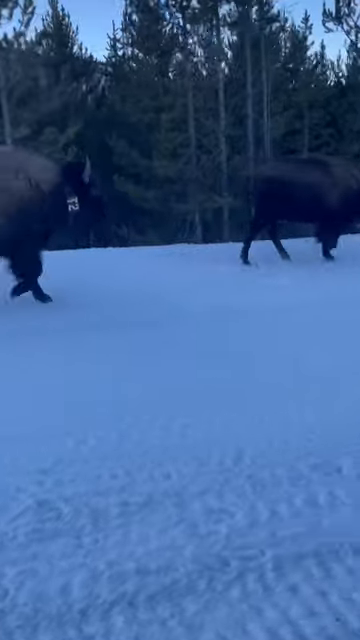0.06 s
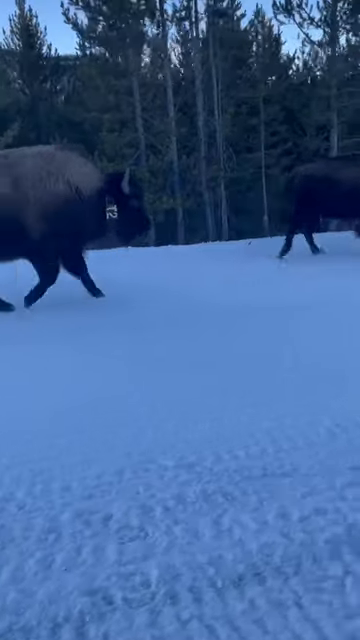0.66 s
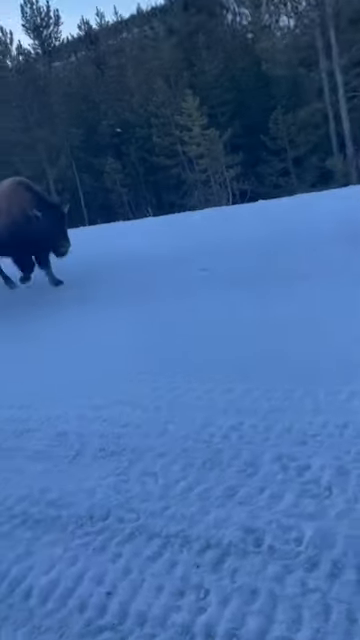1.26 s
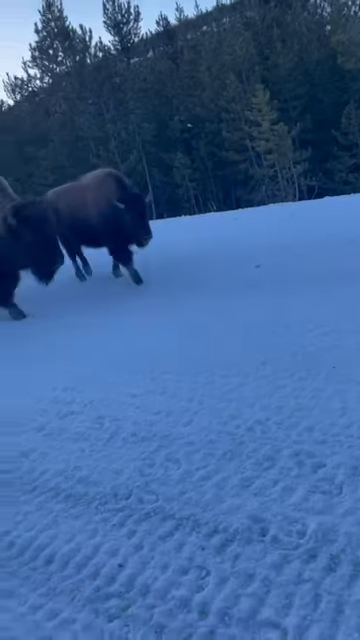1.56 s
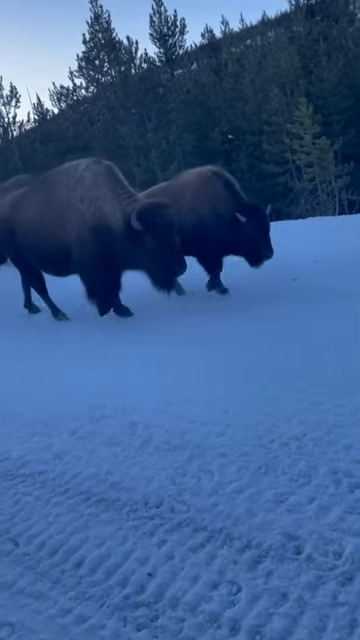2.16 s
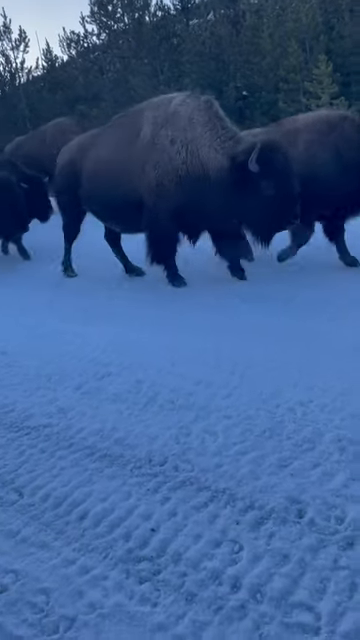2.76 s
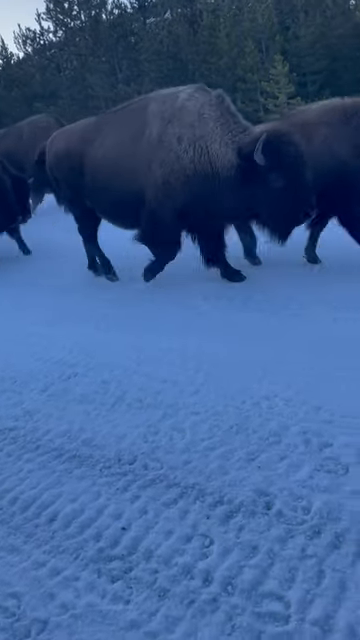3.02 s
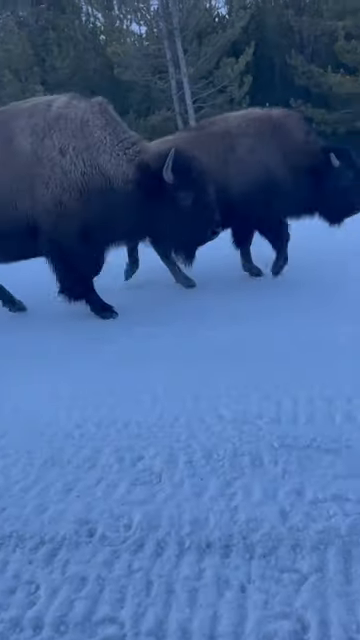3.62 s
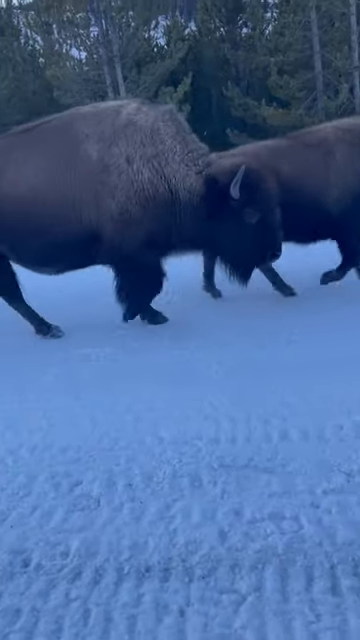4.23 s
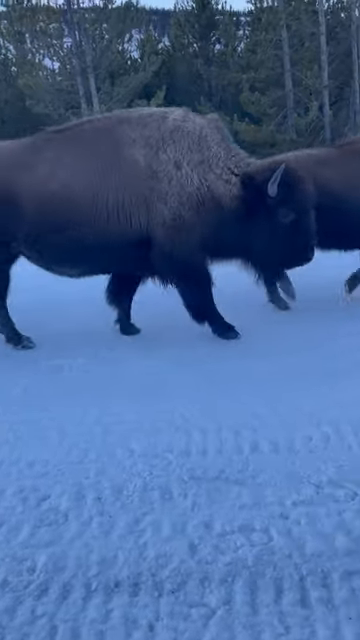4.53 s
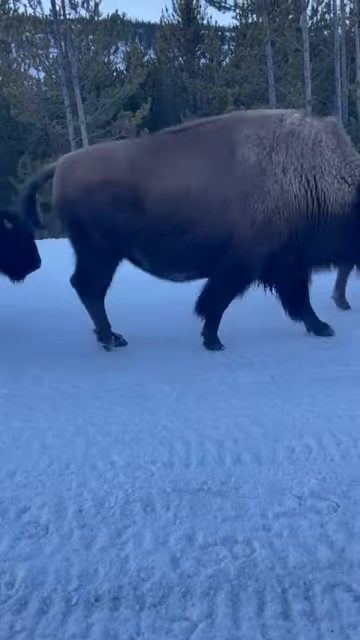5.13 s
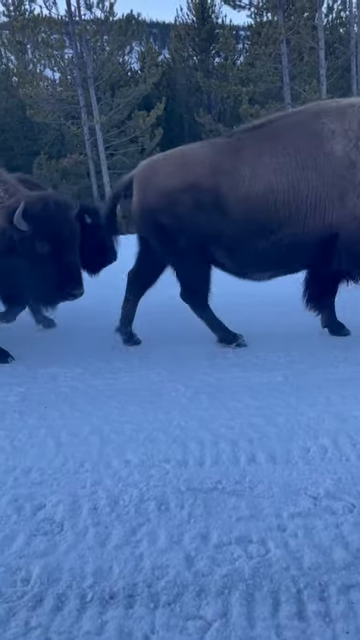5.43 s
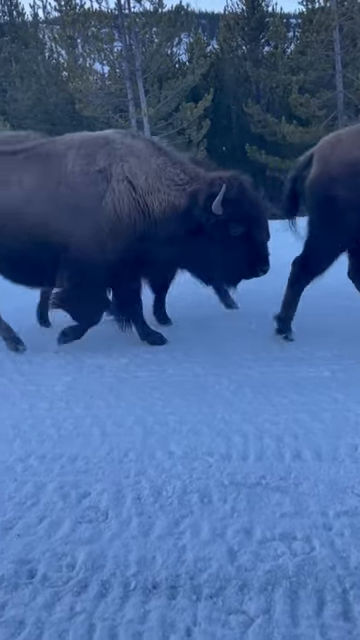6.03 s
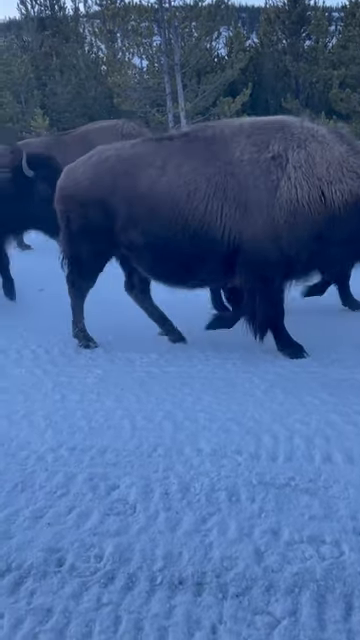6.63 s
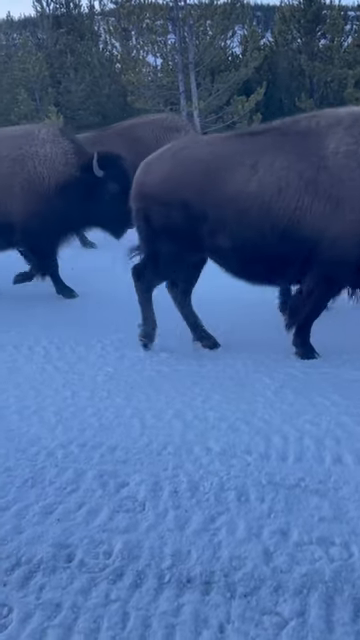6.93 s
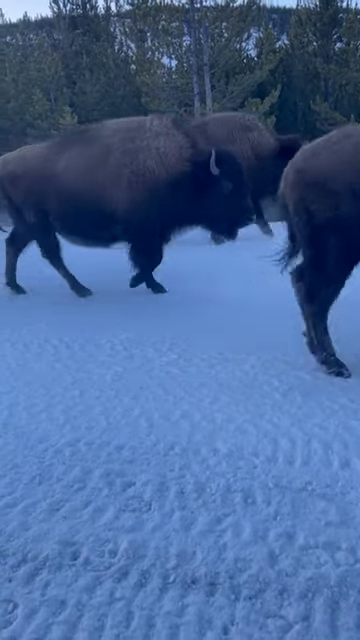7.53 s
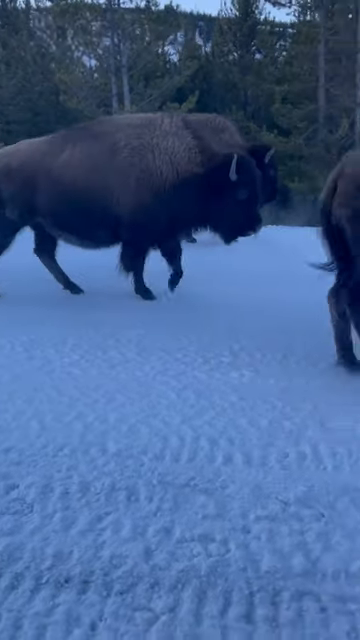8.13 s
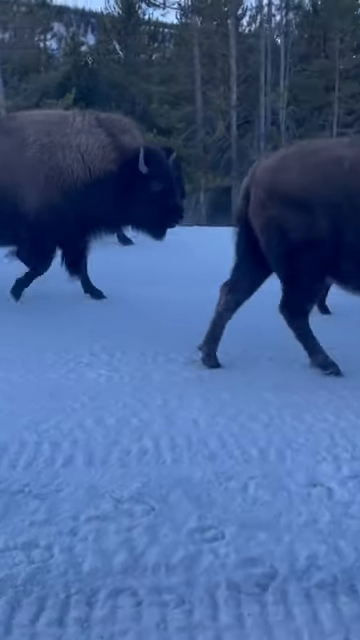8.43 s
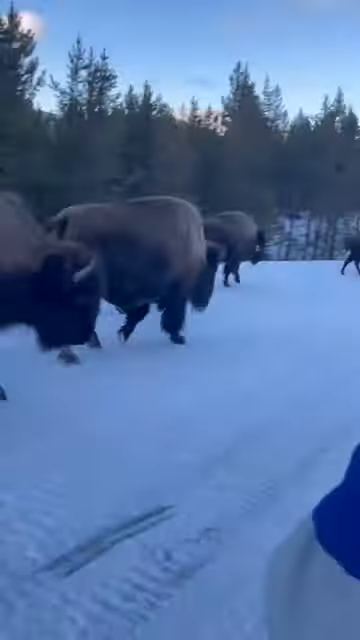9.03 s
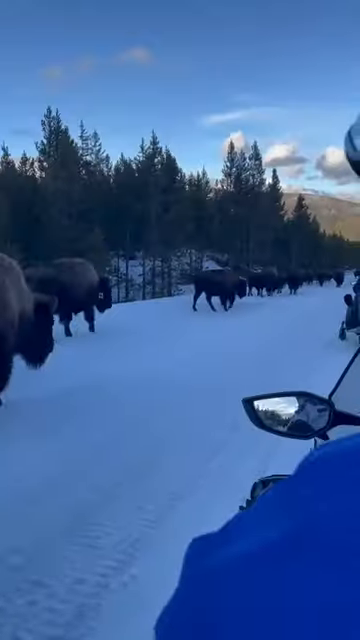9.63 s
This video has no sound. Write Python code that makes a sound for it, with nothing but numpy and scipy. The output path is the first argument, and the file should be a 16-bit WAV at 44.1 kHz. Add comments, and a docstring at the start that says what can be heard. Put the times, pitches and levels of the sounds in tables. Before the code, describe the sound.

Snowmobiles slow to a low idle and pull away again outdoors, with faint snow crunches from bison walking past.

```python
"""Four-stroke snowmobiles drone and putter in a line along a packed snow road while bison walk past.
The near sled eases off, idles and pulls away; two more rise and fall beside it, two idle and the rest
rumble behind. Each exhaust booms in harmonics of its engine speed. Tracks clatter over hissing snow,
clutch and belt cover rattle, tailpipe and belt guard ring. Cold snow crunches and squeaks under the
hooves, and puffs of air brush the microphone."""
import sys
import numpy as np
from scipy import signal
from scipy.fft import dct, next_fast_len
from scipy.io import wavfile
from scipy.ndimage import uniform_filter1d

SR = 44100
rng = np.random.default_rng(int(sys.argv[2]) if len(sys.argv) > 2 else 0)


def inscribe(sig):
    """Save sig as 16-bit PCM at rate SR to the path in sys.argv[1].

    A 1-D sig is mono; a 2-D sig holds one channel per row.
    Samples are clipped to [-1, 1] before scaling.
    """
    pcm = np.round(np.clip(np.atleast_2d(sig).T, -1, 1) * 32767)
    wavfile.write(sys.argv[1], SR, pcm.astype(np.int16))


N = 430857
TIME = np.arange(N) / SR
IDLE_HZ, CRUISE_HZ = 33, 72  # engine cycles per second
IN_STEP_S = 5.917  # the idling engines fire together here: a distinct putter

# Stereo image, side over mid and left over right: frequency_hz, difference_db
STEREO_WIDTH = [(100, -14.5), (300, -20), (500, -8.5), (1000, -14), (1450, -20.5), (2000, -16),
                (2800, -0.5), (3500, -3), (4700, -17.5), (6000, -0.5), (8000, 3), (9500, 28), (11500, 27.5),
                (13000, 13)]
STEREO_LEAN = [(30, -0.3), (60, -1), (125, -1.5), (250, -4), (500, -3), (1000, -1), (3000, -0.5)]

# Tone of the far rumble, track clatter, sliding snow and exhaust gas: frequency_hz, gain_db
RUMBLE_EQ = [(20, -40), (32, -5), (48, -2.5), (100, 2), (200, -1), (250, 2), (290, -7.5), (340, -19.5),
             (450, -28), (700, -48.5), (1500, -90.5)]
CLATTER_EQ = [(500, 0), (800, 3.5), (1100, 2), (1500, -1), (2000, -2), (2350, -5.5), (2650, -6.5),
              (3000, -11), (4500, -34.5), (9000, -50), (12000, -66)]
HISS_EQ = [(1500, 7), (3000, 9), (4500, 9), (6000, 7), (8500, -0.5), (9500, -26.5), (12000, -24),
           (15500, -17)]
RASP_EQ = [(200, -9), (300, 7), (380, 9.5), (440, 4.5), (520, 0), (600, 1.5), (700, -7), (1000, -24.5),
           (1600, -68.5)]
# Tone of snow snapping, splintering and being dragged, and of an air puff: frequency_hz, gain_db
CRUNCH_EQ = [(1500, 5), (3000, 12), (5000, 12.5), (7500, 9), (9000, -1), (11000, -20.5)]
SPLINTER_EQ = [(5000, -26.5), (9000, 3), (12000, -8), (15500, 1.5)]
SCUFF_EQ = [(1500, 0.5), (3000, 5), (6000, 13), (9000, 1), (11000, -12), (15500, -20)]
PUFF_EQ = [(250, -6), (450, 11), (800, 4), (1300, 2), (1900, -5), (2800, -11.5), (4200, -26.5)]
# What passes the near pipe, a pipe heard from the side, and a muffler: frequency_hz, gain_db
NEAR_PIPE_EQ = [(32, -17), (46, 2), (68, 0), (84, 3.5), (100, -0.5), (145, 1.5), (190, -1.5), (214, -2),
                (226, 3), (240, 0.5), (262, 0), (295, -13), (350, -8), (430, -11), (520, -13)]
SIDE_PIPE_EQ = [(35, 6), (70, -6), (95, 0.5), (135, -1), (180, -7.5), (212, 0.5), (258, 2), (280, -7.5)]
MUFFLER_EQ = [(130, -5), (200, -10), (255, -8), (292, -15.5), (328, -13), (358, -19.5), (385, -20.5),
              (425, -23.5), (470, -18), (560, -35), (700, -27.5), (1000, -49)]

# Fader rides for the far group, the idling pair and the three closest exhausts: time_s, gain_db
GROUP_FADER = [(0, 3.5), (2.2, 1), (3.8, 4), (4.7, -0.5), (5.6, 2), (6.5, -1.5), (7.6, 1), (9.2, 2.5),
               (9.77, 4)]
IDLER_FADER = [(0, -5), (2, -4.5), (2.8, 1), (6.7, -1.5), (7.5, -1.5), (9.77, -8)]
SECOND_FADER = [(0, -24), (.4, -25.5), (1.7, -34), (2.5, -25), (3.3, -52), (4.4, -30), (6.1, -31.5),
                (7.4, -27), (8.1, -28), (8.6, -29), (9.77, -27)]
THIRD_FADER = [(0, -53.5), (.7, -31.5), (1.6, -30), (1.95, -27.5), (2.6, -48), (3.2, -40.5), (3.9, -30),
               (5.35, -25.5), (6.05, -31), (6.5, -30.5), (7.1, -37), (9.77, -35)]
NEAR_FADER = [(0, -3.5), (.6, -0.5), (2.3, -3), (3.2, 2), (3.9, -1), (5.3, -1), (5.85, 1.5), (6.4, 1.5),
              (7.4, 0.5), (9.77, -2)]
# Track clatter, tailpipe ring and belt guard ring, high under way: time_s, level_db
TRACK_FADER = [(0, -44.5), (1.15, -44), (1.55, -47), (2.6, -50.5), (3.15, -54.5), (3.45, -58), (3.7, -53.5),
               (5.1, -53.5), (6.85, -51.5), (7.08, -46.5), (7.88, -42), (8.33, -46), (8.67, -41.5),
               (9, -43), (9.77, -41.5)]
TAILPIPE_FADER = [(0, -37), (.4, -36.5), (1.1, -57.5), (3.5, -61.5), (4.4, -53.5), (7.2, -52.5),
                  (9.77, -57)]
GUARD_FADER = [(0, -43), (.8, -52), (1.5, -57.5), (3.4, -73), (5.2, -58), (6.7, -66), (7.05, -48.5),
               (7.3, -45), (7.65, -44), (7.9, -51), (8.1, -46), (8.38, -54), (8.6, -41.5), (8.85, -48),
               (9.05, -44), (9.77, -49)]
# Rattles: the clutch as the belt takes up load, the cover as the slack belt slaps it: time_s, level_db
CLUTCH_FADER = [(0, -53), (.5, -62), (.75, -57), (1.1, -65), (1.7, -74), (3.2, -68), (4.5, -64),
                (4.75, -58), (5.05, -55.5), (5.2, -59), (5.6, -58), (5.9, -65), (6.98, -66), (7.02, -50),
                (7.17, -55), (7.3, -50), (7.4, -53), (7.5, -46), (7.75, -57), (8.15, -59), (8.45, -51),
                (8.55, -55), (8.68, -47), (8.85, -52), (9.08, -44), (9.25, -52), (9.77, -50)]
COVER_FADER = [(0, -54.5), (.55, -57), (1.1, -52), (1.5, -68.5), (2.3, -78), (7.3, -77.5), (7.85, -56),
               (8.152, -72), (9.77, -67.5)]

# Engine speeds of the idling pair: time_s, first_hz, second_hz
IDLER_REVS = [(2.5, 32.44, 32.39), (3.5, 32.94, 32.86), (4.5, 32.3, 32.59), (5.5, 32.79, 32.37),
              (6.7, 32.75, 32.67)]
# Engine speeds of the two sleds alongside and of the near one: time_s, speed_hz
SECOND_REVS = [(0, 66.8), (.35, 67.7), (.8, 63.2), (1.02, 63.2), (1.45, 48.2), (1.75, 46.3), (2.05, 39),
               (2.8, 34.4), (3.6, 34.4), (5, 40.7), (6.15, 39.2), (6.65, 41), (7.3, 47.6), (8.12, 46),
               (8.4, 66.3), (8.85, 68.6), (9.15, 65.4), (9.77, 66)]
THIRD_REVS = [(0, 69), (.8, 65.8), (1.3, 66.5), (1.8, 67.3), (2.1, 64.3), (2.5, 63.4), (2.8, 57.6),
              (3.45, 49), (3.7, 49.3), (3.95, 54.5), (4.3, 58), (4.7, 68), (5.3, 70.2), (5.7, 68.8),
              (5.95, 63.8), (6.15, 63.6), (6.5, 65), (7.1, 66.7), (7.9, 65.8), (9.15, 56), (9.77, 54.4)]
NEAR_REVS = [(0, 66), (.2, 66.3), (.55, 51.3), (1, 47.7), (1.95, 43.2), (2.1, 33.3), (2.8, 32.5),
             (6.72, 32.5), (6.95, 43.5), (7.15, 68.4), (7.55, 78.3), (7.75, 84.5), (7.97, 85.8),
             (8.26, 66.6), (8.65, 74.3), (8.9, 76), (9.1, 71.8), (9.55, 72), (9.77, 68)]
# Balance of exhaust orders (harmonics of engine speed), from the first upward: gain_db
IDLER_HARMONICS = [-16, 2.5, -2.5, -1, -4, -6.5]
SECOND_HARMONICS, THIRD_HARMONICS = [-10.5, -1, -1.5, 0], [-13.5, -4, 0.5, 0]
# The near sled's orders 1 to 6, ahead of its pipe: idle_db, cruise_db
NEAR_HARMONICS = [(-26.5, -30), (-28.5, -18.5), (-26, -22), (-28.5, -27.5), (-26.5, -30.5), (-33.5, -35)]

# Resonances of the tailpipe, then the belt guard's main and lower mode: pitch_hz, base_width_hz
RING_MODES = [(465, 24), (834, 15), (805, 24)]
# Resonances of the clutch and of the belt cover: pitch_hz, width_hz, gain_db
CLUTCH_RESONANCES = [(1696, 150, -6.5), (1818, 63, -7), (1870, 79, -1.5), (1909, 140, -9),
                     (2350, 99, -10.5), (3330, 81, -22)]
COVER_RESONANCES = [(1040, 86, -2), (1700, 140, -1), (2530, 240, -3.5), (3580, 240, -12)]

# Air brushing the microphone, and hooves dragging through loose snow: start_s, length_s, level_db
AIR_PUFFS = [(1.55, 0.073, -48), (1.69, 0.16, -44), (1.91, 0.11, -49), (2.08, 0.13, -47), (2.27, 0.11, -50),
             (2.47, 0.098, -51), (2.81, 0.099, -55), (2.99, .32, -49), (3.28, 0.293, -43),
             (3.87, 0.066, -53), (3.99, 0.091, -49), (4.11, 0.08, -49), (4.23, 0.078, -47), (6.63, .1, -46),
             (8.31, 0.12, -36), (8.41, .14, -41)]
HOOF_SCUFFS = [(1.98, 0.087, -62), (3.91, 0.043, -59), (4.32, 0.21, -59.5), (4.65, 0.084, -60),
               (4.8, 0.053, -68), (5.36, 0.064, -62.5), (5.69, 0.051, -65), (5.87, 0.11, -61),
               (6.3, 0.15, -61.5), (6.8, 0.12, -63), (9.31, 0.045, -49.5)]
# Snow snapping underfoot: start_s, gain_db, dull_offset_db, splinter_offset_db
SNOW_CRUNCHES = [(.07, -55, -5, -20), (0.086, -42, -13, -6), (.4564, -45, -5, -7), (0.732, -41.5, -2, -26),
                 (.79, -46, 0, -15), (.815, -52, -8, -22), (1.2416, -47, 11, -20), (1.307, -47, -3, -20),
                 (2.081, -48, -1, -25), (2.112, -48, 2, -25), (2.5935, -57, -6, -16), (2.806, -50, -9, -17),
                 (3.047, -50, -15, -5), (3.321, -48, -11, -20), (3.731, -48, -5, -4),
                 (4.0452, -41, -14, -22), (4.053, -49, -6, -20), (4.082, -46, -6, -8), (4.092, -46, -7, -8),
                 (4.11, -49, -12, -1), (4.347, -43.5, 3, -20), (4.39, -51, -10, -7), (4.399, -38.5, -6, -8),
                 (4.428, -53, 8, -18), (4.435, -53, -13, -5), (5.3966, -49, -8, -20), (5.738, -49, -6, -19),
                 (5.864, -46.5, -6, -12), (5.9995, -48.5, 7, -17), (6.012, -53, 6, -20),
                 (6.2986, -42, -13, -25), (6.3386, -47, -7, -19), (6.374, -45, 2, -7),
                 (6.8626, -42.5, -6, -25), (6.965, -45, -8, -7), (7.3275, -47, -8, -24),
                 (7.5153, -45, -6, 1), (9.3216, -41, -9, -2), (9.328, -40, -10, -5),
                 (9.334, -42.5, -12, -6)]
# Hooves squeaking on packed snow: start_s, level_db, pitch_hz
HOOF_SQUEAKS = [(.565, -29, 880), (1.179, -30.5, 1020), (2.111, -34, 950), (2.631, -34.5, 1150),
                (2.671, -38, 1400), (2.811, -36, 850), (3.561, -40, 1300), (4.428, -42, 748),
                (4.919, -41.5, 830), (5.067, -33.5, 960), (5.148, -40, 850), (5.364, -43, 900),
                (5.8, -41, 850), (5.858, -41, 1100), (6.009, -41, 1200)]


def from_db(db):
    """Decibels to gain."""
    return 10 ** (np.asarray(db) / 20)


def unit_power(x):
    """Scale to an RMS of one."""
    return x / np.sqrt(np.mean(x ** 2) + 1e-20)


def curve(rows, column=1):
    """One column of an automation table at every sample."""
    columns = np.transpose(rows)
    return np.interp(TIME, columns[0], columns[column])


def eq_db(eq, hz):
    """Read an EQ curve on a log-frequency axis."""
    known_hz, gains_db = np.transpose(eq)
    return np.interp(np.log(np.maximum(hz, 1)), np.log(known_hz), gains_db)


def colour(x, eq, amount=1):
    """Filter by an EQ curve whose decibels are scaled by amount."""
    size = next_fast_len(N, True)
    padded = np.pad(x, [(0, 0)] * (x.ndim - 1) + [(0, size - N)], "reflect")
    gain = from_db(amount * eq_db(eq, np.arange(size) * SR / (2 * size)))
    return dct(dct(padded, norm="ortho") * gain, type=3, norm="ortho")[..., :N]


def drift(rate_hz):
    """A smooth random wander with a spread of about one."""
    hop, run_in = 40, 2000
    pole = np.exp(-2 * np.pi * hop * rate_hz / SR)
    white = rng.standard_normal(N // hop + run_in + 2)
    slow = signal.lfilter([1], [1, -2 * pole, pole * pole], white)[run_in:]
    return np.interp(np.arange(N) / hop, np.arange(len(slow)), unit_power(slow))


def white_pair(length=N):
    """Two unrelated channels of white noise."""
    return rng.standard_normal((2, length))


def noise_pair(eq, gate=1):
    """Two unrelated noises, chopped by a gate and coloured; unit power."""
    return unit_power(colour(gate * white_pair(), eq))


def spread(pair):
    """Mid and side become left and right, wider in the treble."""
    mid, side = pair
    return mid + colour(side, STEREO_WIDTH) * [[1], [-1]]


def resonate(x, hz, width_hz):
    """A resonance applied twice for steep skirts; unit power."""
    radius = np.exp(-np.pi * width_hz / SR)
    section = [1, 0, -1, 1, -2 * radius * np.cos(2 * np.pi * hz / SR), radius * radius]
    return unit_power(signal.sosfilt([section, section], x))


def even_out(x, window_s=.025, amount=.3):
    """Gentle compression: a part that is driven all the time rings at a more even strength."""
    power = uniform_filter1d(x ** 2, size=round(window_s * SR))
    return unit_power(x / np.maximum(power, 1e-6) ** (amount / 2))


def swells(events, edge_s):
    """Envelope of events that fade in, hold and fade out."""
    envelope = np.zeros(N)
    for start_s, length_s, db in events:
        age = np.arange(round(length_s * SR)) / SR
        at = round(start_s * SR)
        envelope[at:at + len(age)] += from_db(db) * np.clip(np.minimum(age, length_s - age) / edge_s, 0, 1)
    return envelope


def click_train(rate_hz, uneven_db):
    """One click per cycle, each of its own strength."""
    cycles = np.cumsum(rate_hz) / SR
    at = np.flatnonzero(np.diff(np.floor(cycles)) > 0)
    clicks = np.zeros(N)
    clicks[at] = from_db(uneven_db * rng.standard_normal(N)[at])
    return clicks


def synced_cycles(speed_hz):
    """Engine cycles counted from the moment when the idling sleds fire together."""
    cycles = np.cumsum(speed_hz) / SR
    return cycles - cycles[round(IN_STEP_S * SR)]


def exhaust(cycles, levels_db, rough, smear, first_order=1):
    """Successive exhaust orders; the pipe smears their phases and combustion varies their strength."""
    tone = np.zeros(N)
    for order, db in enumerate(levels_db, first_order):
        strength = np.sqrt(2) * from_db(db) * (1 + rough * drift(5.9))
        tone += strength * np.cos(2 * np.pi * order * cycles + smear * (order - 2) ** 2)
    return tone


def far_group(throb_db, rumble_db):
    """Sleds further down the line tick over at wandering speeds and blur into a rumble."""
    speeds_hz = np.geomspace(44, 62, 3)
    firings = sum(click_train(hz * from_db(.5 * drift(.25)), uneven_db=.7) for hz in speeds_hz)
    throb = from_db(throb_db) * unit_power(colour(firings - firings.mean(), RUMBLE_EQ))
    rumble = from_db(rumble_db) * spread(noise_pair(RUMBLE_EQ))
    return from_db(curve(GROUP_FADER)) * (throb + rumble)


def idling_pair(gains_db):
    """Two sleds beat slowly against the near one's idle and drop behind as it pulls away."""
    putter = np.zeros(N)
    for column, db in enumerate(gains_db, 1):
        cycles = synced_cycles(curve(IDLER_REVS, column))
        putter += exhaust(cycles, np.add(IDLER_HARMONICS, db), rough=.06, smear=.15)
    return from_db(curve(IDLER_FADER)) * putter


def air_puffs(mid_db):
    """Eddies at the microphone push its two sides apart: short, wide, soft rushes."""
    mid, side = noise_pair(PUFF_EQ)
    return swells(AIR_PUFFS, edge_s=.025) * (from_db(mid_db) * mid + side * [[1], [-1]])


def hoof_scuffs():
    """Hooves drag through loose snow with a grainy swish."""
    return swells(HOOF_SCUFFS, edge_s=.016) * from_db(2 * drift(90)) * noise_pair(SCUFF_EQ)


def snow_crunches(crisp_db, body_db, decay_s, ticks_per_s):
    """Cold snow snaps in bursts of grains, some dull, some splintering, with faint ticks between."""
    bright, dull, sharp = np.zeros((3, N))
    age = np.arange(SR // 10) / SR
    burst = (1 - np.exp(-age / .0002)) * np.exp(-age / decay_s)
    for start_s, db, dull_db, splinter_db in SNOW_CRUNCHES:
        at = round(start_s * SR)
        span = slice(at, at + len(burst))
        bright[span] += from_db(db) * burst
        dull[span] += from_db(db + dull_db) * burst
        sharp[span] += from_db(db + splinter_db) * burst
    ticks = (rng.random(N) < ticks_per_s / SR) * from_db(-55 + 2 * rng.standard_normal(N))
    bright += signal.fftconvolve(ticks, burst)[:N]
    grains = from_db(2.5 * drift(600))
    crisp = bright * noise_pair(CRUNCH_EQ, grains) + sharp * noise_pair(SPLINTER_EQ, grains)
    body = dull * spread(noise_pair(CLATTER_EQ, grains))
    return from_db(crisp_db) * crisp + from_db(body_db) * body


def hoof_squeaks(decay_s, width_hz):
    """Snow compacts under a hoof in a short, rough squeak."""
    squeaks = np.zeros((2, N))
    age = np.arange(SR // 8) / SR
    envelope = (1 - np.exp(-age / .0014)) * np.exp(-age / decay_s)
    for start_s, db, pitch_hz in HOOF_SQUEAKS:
        at = round(start_s * SR)
        squeak = resonate(white_pair(len(age)), pitch_hz, width_hz)
        squeaks[:, at:at + len(age)] += from_db(db) * envelope * squeak
    return spread(squeaks)


def tracks_on_snow(sliding_db, standstill_db):
    """Track clatter and snow hiss rise and fall together; a little hiss remains at a standstill."""
    track_db = curve(TRACK_FADER)
    judder = from_db(1.5 * drift(34) + .8 * drift(8.9))
    clatter = from_db(track_db) * spread(noise_pair(CLATTER_EQ, judder))
    swing_db = .78 * (track_db + 42.5)  # the hiss follows most of the clatter's swing about its rolling level
    hiss_gain = np.hypot(from_db(sliding_db + swing_db), from_db(standstill_db))
    grains = from_db(2 * drift(230) + .5 * drift(5.8))
    return clatter + hiss_gain * spread(noise_pair(HISS_EQ, grains))


def rattle(modes, fader, knocks_per_s=70, decay_s=.007, buzz=.4):
    """A loose part buzzes steadily, knocks at uneven moments and rings in its modes."""
    knocks = click_train(knocks_per_s * from_db(4 * drift(25)), uneven_db=2)
    contact = buzz + signal.lfilter([1], [1, -np.exp(-1 / (decay_s * SR))], knocks)
    ring = sum(from_db(db) * even_out(resonate(contact * white_pair(), hz, width_hz))
               for hz, width_hz, db in modes)
    return from_db(curve(fader)) * ring


def sled_body(airbox_db, widen=1.55):
    """Engine shake rings the tailpipe and belt guard; clutch and cover rattle; the airbox drones."""
    shake = white_pair()
    pipe, guard_main, guard_lower = (resonate(shake, hz, widen * width) for hz, width in RING_MODES)
    tailpipe = from_db(curve(TAILPIPE_FADER)) * pipe
    guard = from_db(curve(GUARD_FADER)) * even_out(guard_main + from_db(-3.5) * guard_lower)
    airbox = from_db(airbox_db) * resonate(white_pair(), hz=560.4, width_hz=100)
    rattles = rattle(CLUTCH_RESONANCES, CLUTCH_FADER) + rattle(COVER_RESONANCES, COVER_FADER)
    return spread(tailpipe + guard + rattles + airbox)


def gas_rasp(speed_hz, idle_db, db_per_octave=9):
    """Exhaust gas rasps in pulses with the engine and grows louder with its speed."""
    pulsing = from_db(1.8 * np.cos(2 * np.pi * np.cumsum(speed_hz) / SR))
    level_db = idle_db + db_per_octave * np.log2(speed_hz / IDLE_HZ)
    return from_db(level_db) * spread(noise_pair(RASP_EQ, pulsing))


def sled_alongside(speed_hz, fader_db, harmonics_db, buzz_db):
    """An exhaust a few lengths away: a soft fundamental, three strong orders and a weak muffler buzz."""
    cycles = np.cumsum(speed_hz) / SR
    low_db = [fader_db + db + eq_db(SIDE_PIPE_EQ, order * speed_hz)
              for order, db in enumerate(harmonics_db, 1)]
    high_db = [buzz_db + eq_db(MUFFLER_EQ, order * speed_hz) for order in range(5, 9)]
    boom = exhaust(cycles, low_db, rough=.1, smear=.5)
    return boom + exhaust(cycles, high_db, rough=.25, smear=.5, first_order=5)


def near_sled(speed_hz, full_load_hz_per_s=250):
    """Low orders boom through the pipe, the firing order most under load; upper ones pass the muffler."""
    acceleration = uniform_filter1d(np.gradient(speed_hz) * SR, size=SR // 10)
    cruising = np.clip((speed_hz - IDLE_HZ) / (CRUISE_HZ - IDLE_HZ), 0, 1)
    load = np.minimum(np.maximum(acceleration, 0) / full_load_hz_per_s + cruising ** 2, 1)
    # under load the belt tugs at the crank and the firing is less even
    cycles = synced_cycles(speed_hz) + .006 * load * drift(12)
    fader_db = curve(NEAR_FADER)
    low_db = [fader_db + idle_db + load * (cruise_db - idle_db) + eq_db(NEAR_PIPE_EQ, order * speed_hz)
              for order, (idle_db, cruise_db) in enumerate(NEAR_HARMONICS, 1)]
    # the pipe spreads the pulses: separate thumps at idle, a smooth drone at speed
    smear = .15 * (speed_hz / IDLE_HZ) ** 2
    boom = exhaust(cycles, low_db, rough=.06 + .05 * load, smear=smear)
    buzz_db = -32.5 + 3 * np.log2(speed_hz / IDLE_HZ)
    high_db = [buzz_db + eq_db(MUFFLER_EQ, order * speed_hz) for order in range(7, 13)]
    wobble = .008 * drift(5)
    return boom + exhaust(cycles + wobble, high_db, rough=.35, smear=.2, first_order=7)


def scene():
    """Mix the sleds, the hooves and the air; the low end leans to the right."""
    near_hz, second_hz, third_hz = curve(NEAR_REVS), curve(SECOND_REVS), curve(THIRD_REVS)
    second_db, third_db = curve(SECOND_FADER), curve(THIRD_FADER)
    near = near_sled(near_hz)
    second = sled_alongside(second_hz, second_db, SECOND_HARMONICS, buzz_db=-36.5)
    third = sled_alongside(third_hz, third_db, THIRD_HARMONICS, buzz_db=-41)
    bed = idling_pair(gains_db=(-36.5, -45)) + far_group(throb_db=-27, rumble_db=-29.5)
    rasp = gas_rasp(near_hz, idle_db=-52) + gas_rasp(second_hz, idle_db=second_db - 18)
    machinery = tracks_on_snow(sliding_db=-54.5, standstill_db=-61) + sled_body(airbox_db=-52.5)
    squeaks = hoof_squeaks(decay_s=.005, width_hz=900)
    crunches = snow_crunches(crisp_db=2, body_db=-2, decay_s=.004, ticks_per_s=9)
    bison = squeaks + crunches + hoof_scuffs()
    left, right = bed + air_puffs(mid_db=-26.5) + bison + machinery + rasp + second + third + near
    return np.array([colour(left, STEREO_LEAN, .5), colour(right, STEREO_LEAN, -.5)])


def record(dry):
    """Ease both ends and cut the extreme top steeply."""
    fade_s, cutoff_hz = .004, 15800
    fade = np.clip(np.minimum(TIME, TIME[-1] - TIME) / fade_s, 0, 1)
    lowpass = signal.ellip(10, .1, 80, cutoff_hz, fs=SR, output="sos")
    return signal.sosfilt(lowpass, dry * fade)


dry = scene()
out = record(dry)
inscribe(out)
```